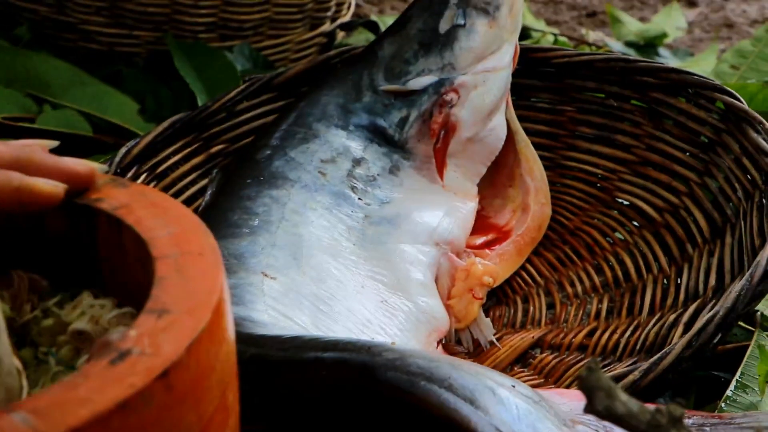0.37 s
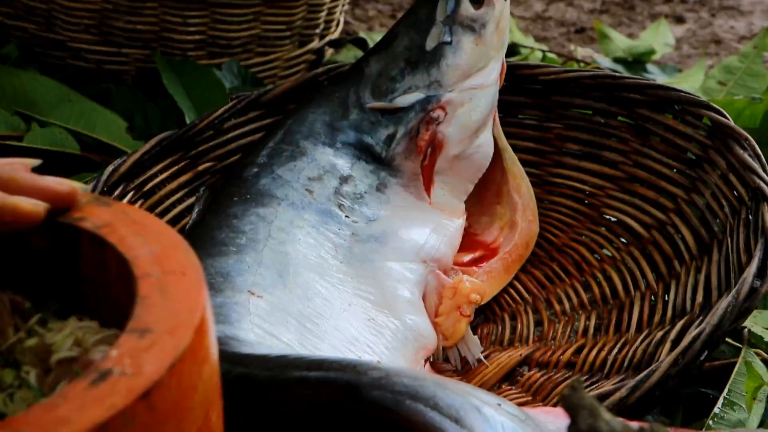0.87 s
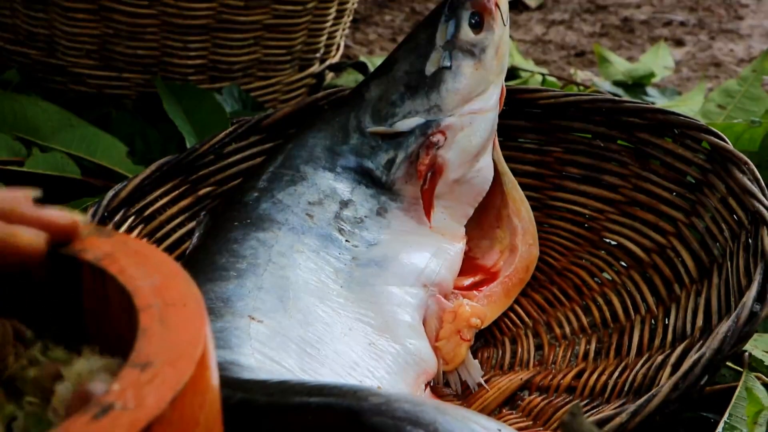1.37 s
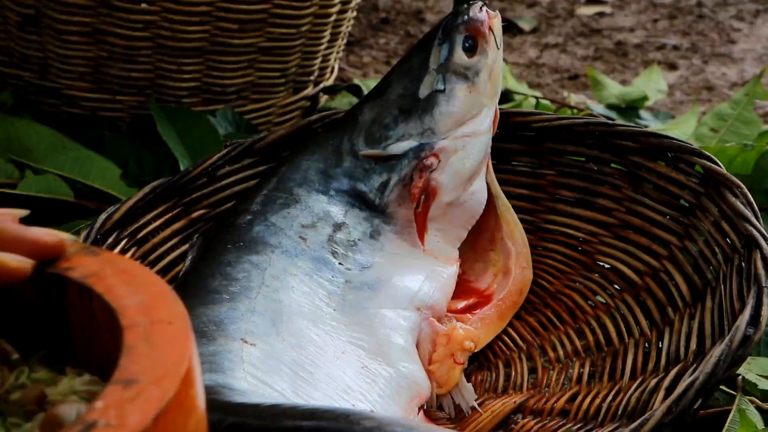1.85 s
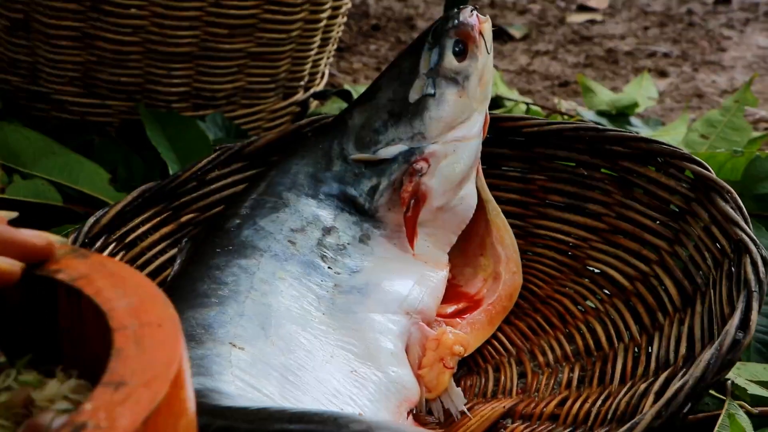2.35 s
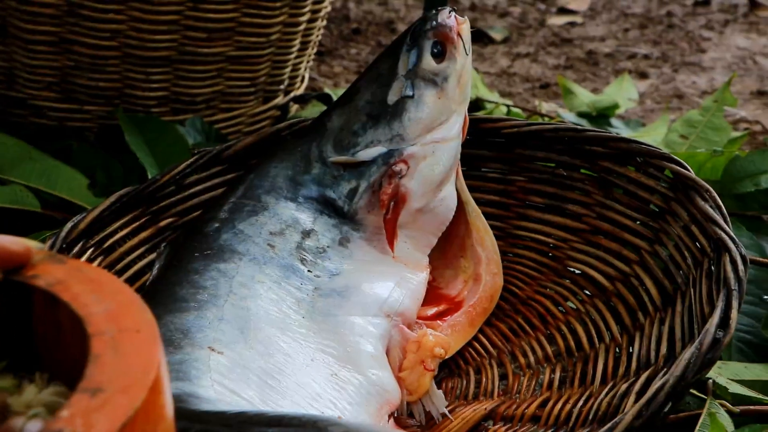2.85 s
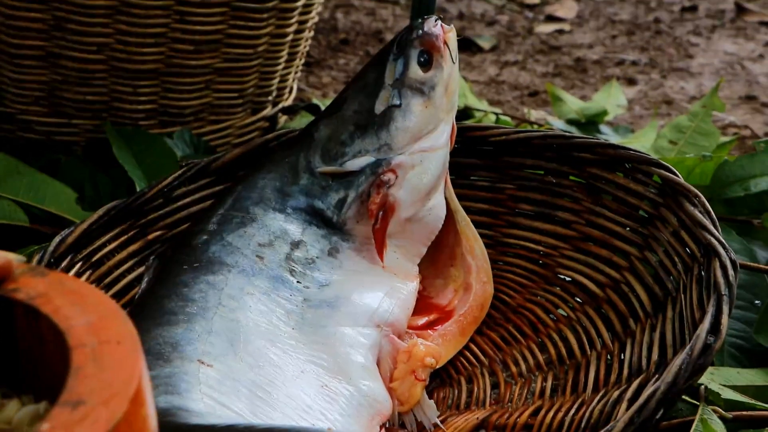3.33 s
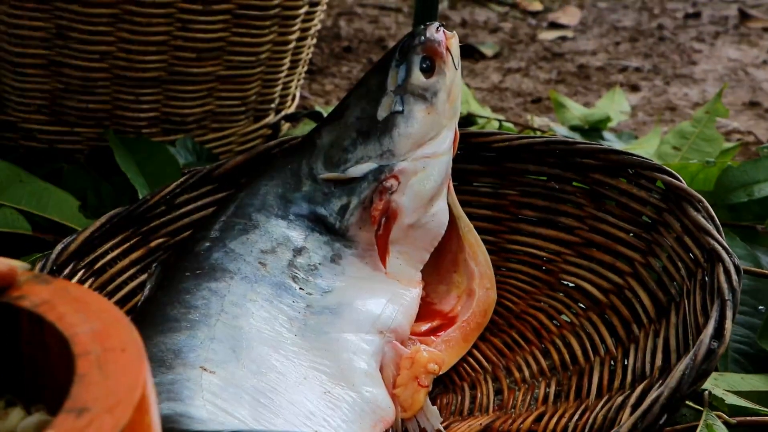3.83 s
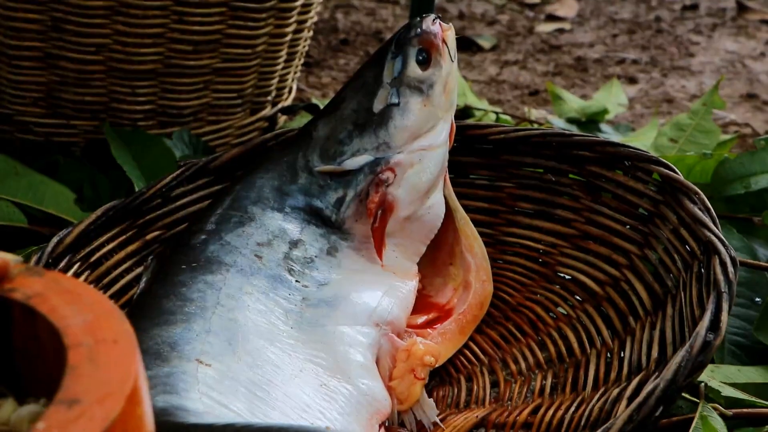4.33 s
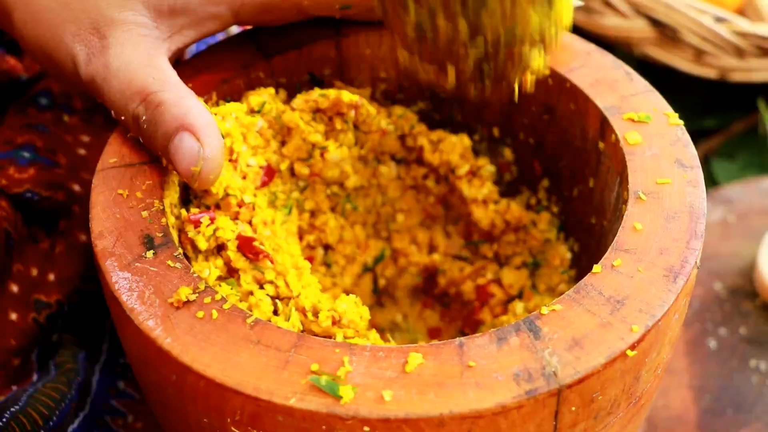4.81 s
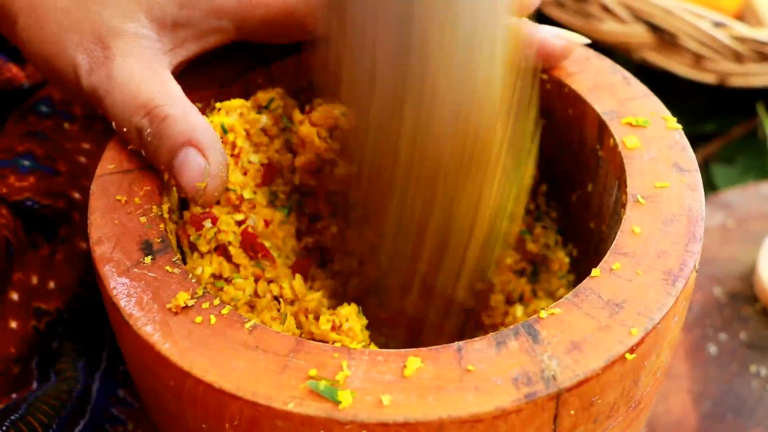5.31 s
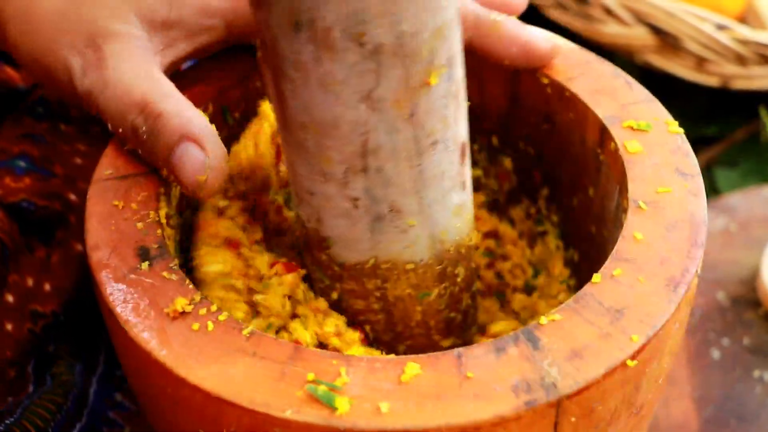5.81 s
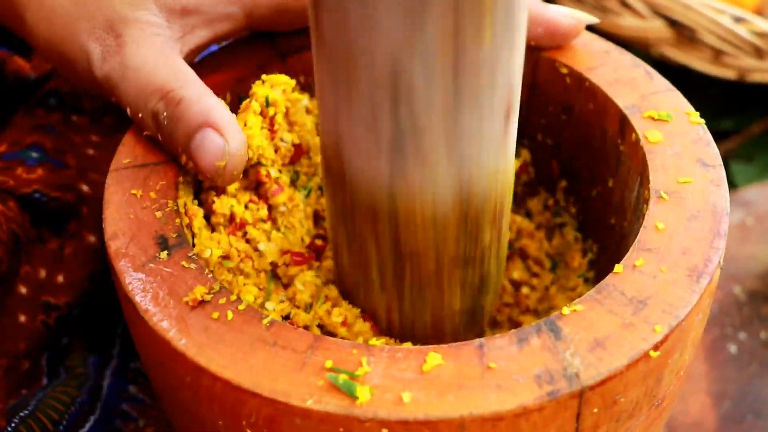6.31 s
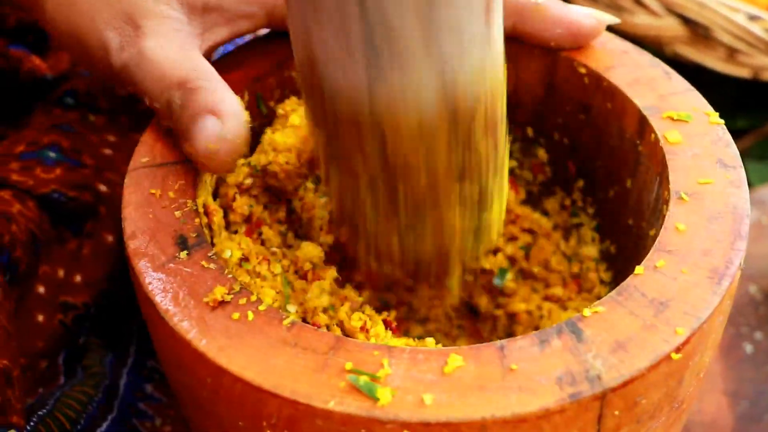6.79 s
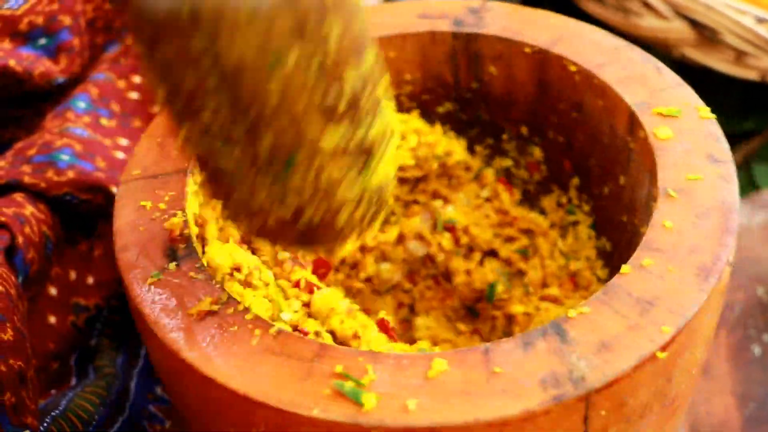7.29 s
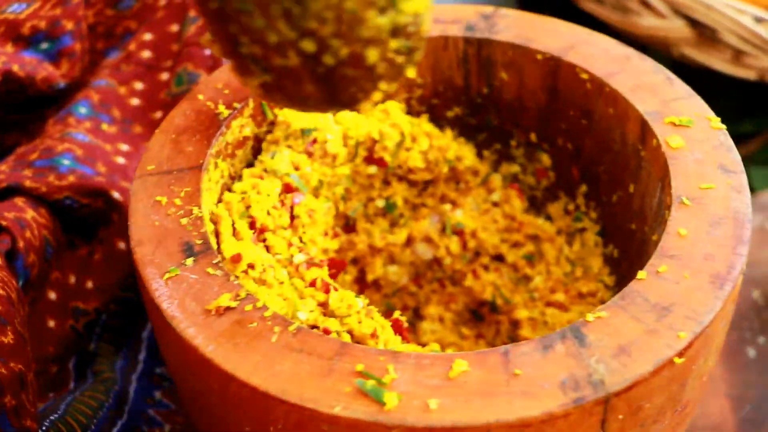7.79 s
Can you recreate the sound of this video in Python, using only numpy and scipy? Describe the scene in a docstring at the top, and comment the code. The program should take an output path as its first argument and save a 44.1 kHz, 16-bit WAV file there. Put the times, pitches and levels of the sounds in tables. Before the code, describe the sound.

A wooden pestle pounds crunching spices in a wooden mortar in steady beats, low thuds beneath, ending with slower blows and lighter knocks outdoors.

```python
"""Blow after blow, spices crunch, wood knocks and a low thud follows; small crumbs click in between.
A wooden pestle pounds in a wooden mortar on the ground of a forest clearing: snapping grains make the
crunch, decaying modes the knocks, and the mortar resonating on the soil the thuds.
First a single microphone listens, with a faint motor ticking near it and a low hum from far away;
then a stereo pair with gain control, left louder. Behind both lies forest air, made of banded noise."""
import sys
import numpy as np
from scipy import signal
from scipy.io import wavfile
from scipy.ndimage import uniform_filter1d

SR = 44100
rng = np.random.default_rng(int(sys.argv[2]) if len(sys.argv) > 2 else 0)


def boost(x):
    """Linear amplitude factor 10**(x/20) for a level x in decibels (scalar or array-like)."""
    u = np.asarray(x, float) / 20
    return 10 ** u


def master_out(mix):
    """Clip the mix to full scale and print it as 16-bit PCM to the path in sys.argv[1]."""
    frames = np.transpose(np.atleast_2d(mix))
    ceiling = np.clip(frames, -1, 1)
    pcm = np.round(ceiling * 32767).astype(np.int16)
    wavfile.write(sys.argv[1], SR, pcm)


N = 359415

# forest air at the single microphone, then at the pair: spectrum shape [f/Hz, relative level per Hz/dB]
AIR_SINGLE = [(15, -31.5), (25, 1), (91, 1.5), (463, -16), (1040, -18), (1890, -17), (3240, -23.5),
              (5130, -21.5), (7290, -24), (8810, -17), (10600, -27), (14700, -28), (16000, -27)]
AIR_PAIR = [(15, -36.5), (25, -1.5), (137, -2.5), (270, -5), (489, -13.5), (817, -16), (1230, -14.5),
            (1940, -18.5), (2830, -18.5), (4860, -25), (8810, -20), (14700, -38), (16000, -42)]
# air between the capsules of the pair [f/Hz, left-right likeness, used from 0 to 1]
AIR_LIKENESS = [(60, 0.71), (240, 0.68), (950, 0.16), (3770, -0.04), (15000, -0.03)]
# air at the pair [f/Hz, left minus right level/dB]
AIR_LEAN = [(60, 8.5), (380, 7.0), (2380, 4.5), (15000, 5)]
# distant hum at the single microphone [t/s, rms level/dB]
DRONE_LEVEL = [(0.0, -48), (0.25, -48), (0.46, -52), (1.12, -55), (1.68, -51), (2.01, -46), (2.25, -53),
               (2.88, -55), (3.02, -50), (3.41, -45), (3.72, -49), (4.54, -47), (4.75, -51)]
# motor near the single microphone [t/s of the first tick, number of ticks]
MOTOR_RUNS = [(.114, 12), (.654, 10)]
# resonances of the motor housing [f/Hz, mean level/dB, t60/s]
MOTOR_HOUSING = [(2940, -39, .015), (3450, -40, .007), (4030, -38, .008), (4780, -40, .007)]
# thin ringing of something small and hard [t/s, mean level/dB]
TINKLES = [(3.269, -41), (3.407, -41), (3.663, -37), (3.6685, -20), (3.6705, -24), (3.692, -43)]
# its resonances [f/Hz, mean relative level/dB, t60/s]
TINKLE_MODES = [(5550, -8, .032), (7950, -3, .03), (8800, -3, .018), (12500, -4, .012)]
# crumbs and small ticks [t/s, peak level/dB, pitch f/Hz]
CRUMBS = [(0.1374, -33, 5770), (0.4125, -28, 2860), (0.4788, -26.5, 9740), (0.819, -24, 9200),
          (0.9926, -19, 7270), (1.1343, -36, 2930), (1.254, -35.5, 2950), (1.5364, -23, 6120),
          (1.5848, -29, 9180), (1.9999, -19, 5830), (2.2398, -33, 2470), (2.6184, -28.5, 4810),
          (2.9557, -30, 3170), (3.0669, -34, 9980), (3.1792, -16.5, 7240), (3.2884, -20.5, 9200),
          (3.3164, -30, 4060), (3.3298, -26, 4160), (3.3434, -30, 2390), (3.6688, -19, 8500),
          (3.6795, -29, 7920), (4.3994, -25.5, 5890), (4.4223, -20.5, 9400), (4.5725, -31, 5880),
          (5.2475, -30.5, 6980), (5.5353, -34.5, 3560), (6.8129, -23.5, 9770), (6.9546, -33, 8420),
          (7.3766, -33.5, 8920), (7.4525, -31.5, 8130), (7.7553, -37, 3060), (8.083, -34.5, 7730)]
# wood meets wood [t/s, crack level/dB, hollow level/dB, ring level/dB, side struck/turns round the bowl]
KNOCKS = [(0.0048, -4, -17, 0, .52), (0.0078, 3, -6, -7, .33), (0.341, -14, -34, -9, .66),
          (0.355, -3, -14, -9, .8), (0.6907, -21, -26, -10, .05), (0.6993, -19, -38, -11, .6),
          (0.7072, 3, 1, -5, .92), (1.0466, -16, -22, -4, .16), (1.0618, -6, -3, -2, .95),
          (1.4101, -21, -27, -10, .05), (1.4276, -2, -9, -12, .7), (1.7698, -3, -30, -9, .58),
          (1.7788, -11, -24, 1, .5), (1.7857, -7, -11, -5, .33), (2.1388, -5, -17, -2, .22),
          (2.1434, 5, -26, -3, .56), (2.4988, -16, -21, -11, .68), (2.5061, 5, -14, -7, .76),
          (2.8538, -19, -23, -8, .36), (2.8638, 2, -15, -4, .43), (3.2028, -24, -39, -16, .62),
          (3.2125, -16, -23, -15, .95), (3.222, -1, -10, -4, .8), (3.5727, -7, -30, -2, .52),
          (3.5749, -1, -27, 3, .54), (3.9359, -3, -10, -4, .85), (4.292, -2, -11, -5, .99),
          (4.6482, -3, -9, -7, .86), (4.9725, -10, -21, -11, .34), (4.9768, -12, -14, -11, .47),
          (5.3861, -4, -14, 1, .63), (5.3912, -18, -22, -9, .62), (5.8008, -19, -16, -14, .75),
          (6.1999, -5, -11, 3, .43), (6.6048, -19, -16, -25, .95), (7.1027, -26, -12, -5, .14),
          (7.1058, -30, -19, -9, .3), (7.2867, -23, -8, -6, .15), (7.2896, -25, -18, -2, .28)]
# modes of the wood, before damping and detuning
# [f/Hz, relative level/dB, t60/s, driven by 1 crack, 2 hollow, 3 bowl, 4 wall, 5 pestle]
WOOD_MODES = [(300, 4, .024, 2), (450, 6, .02, 2), (745, 4, .03, 3), (1168, -9, .07, 4), (1180, 0, .026, 4),
              (1480, 2, .024, 5), (2250, -8, .026, 1), (3000, -6, .016, 1), (4200, -7, .011, 1),
              (5700, -11, .01, 1), (7400, -11, .009, 1), (9500, -14, .008, 1)]
# full blows through the spices to the bottom
# [t/s of the crunch peak, relative crunch level/dB, sinking/s, relative treble level/dB, relative thud level/dB]
BLOWS = [(.008, -12.5, .005, -8, -10), (.357, -13.5, .016, -11.5, -6.5), (.7085, -19, .018, -9, -14.5),
         (1.0635, -18, .017, -7.5, -16.5), (1.4285, -14, .02, -10, -9), (1.786, -20, .017, -9.5, -11),
         (2.1445, -12.5, .016, -6.5, -14.5), (2.5075, -15, .01, -7, -15), (2.865, -11.5, .012, -7, -10),
         (3.223, -14.5, .013, -8, -8.5), (3.578, -13.5, .016, -4.5, -9.5), (3.937, -12.5, .01, -10, -9),
         (4.293, -9.5, .01, -9.5, -9), (4.65, -18.5, .022, -7.5, -7.5), (4.981, -24, .01, -9, -12.5),
         (5.799, -22.5, .015, -5, -16), (6.2035, -21, .004, -6, -21), (6.602, -23, .016, -8.5, -13.5)]
# spices stirred without a landing [t/s of the peak, relative level/dB, sinking/s, relative treble/dB, fade t60/s]
STIRS = [(2.62, -42, .015, -12, .04), (2.955, -42, .015, -14, .04), (3.335, -35, .02, -14, .04),
         (3.922, -36, .003, -8, .015), (4.262, -32, .002, -6, .012), (5.001, -40, .005, -3, .025),
         (5.3875, -14, .002, -1, .008), (7.1035, -40, .002, -10, .015), (7.289, -36, .003, -10, .015)]
# mortar on the soil [f/Hz, relative level/dB, t60/s]
GROUND_MODES = [(63, -8, .1), (78, -1, .135), (135, -11, .07)]
# crunch spectrum shape [f/Hz, relative level per Hz/dB]
CRUNCH_SPECTRUM = [(180, -38), (300, -14), (800, -1), (2200, -2.5), (4000, -7), (7000, -12), (10000, -18),
                   (14000, -26), (16000, -38)]

FADE_START_S, FADE_END_S = 4.70, 4.76   # from the single microphone to the pair
LEFT_RIGHT = np.array([[1], [-1]])


def at_hz(points, hz):
    """Read a table along log frequency."""
    f, value = np.transpose(points)
    return np.interp(np.log(hz), np.log(f), value)


def clicks(seconds, heights):
    """Impulses of the given heights on two channels, the start of every resonance."""
    out = np.full((N, 2), 1e-18)
    index = (np.asarray(seconds) * SR).astype(int)
    np.add.at(out, index, np.reshape(heights, (len(seconds), -1)))
    return out.T


def ring(x, hz, t60, crest=False):
    """A unit click starts a dying sine, or a cosine that begins at its crest."""
    r = boost(-60 / (max(t60, .001) * SR))
    w = 2 * np.pi * hz / SR
    top = [1, -r * np.cos(w)] if crest else [0, np.sin(w)]
    return signal.lfilter(top, [1, -2 * r * np.cos(w), r * r], x)


def soften(x, hz):
    """Two one-pole low-passes, as in a contact of finite length."""
    r = np.exp(-2 * np.pi * hz / SR)
    return signal.lfilter([(1 - r) ** 2], [1, -2 * r, r * r], x)


def third_octaves():
    """Third-octave band-pass filters from 22 Hz up, with their centres."""
    edges = 22 * 2 ** np.arange(0, 9.7, 1 / 3)
    return [(signal.butter(2, (low, high), "band", fs=SR, output="sos"), np.sqrt(low * high))
            for low, high in zip(edges, edges[1:])]


def pair_share():
    """0 while the single microphone listens, 1 for the pair."""
    return np.interp(np.arange(N) / SR, [FADE_START_S, FADE_END_S], [0, 1])


def air(pair):
    """Distant leaves, insects and light wind: banded noise that flickers slightly."""
    single_db, pair_db = -44, -45   # rms level/dB
    flicker_db = 1.2
    white, single, stereo = rng.standard_normal((2, 2, N)), 0, 0
    for k, (sos, hz) in enumerate(third_octaves()):
        mid, side = signal.sosfilt(sos, white[k % 2])   # neighbouring bands use separate noise
        # one point per 100 samples, so 900 Hz here acts as 9 Hz
        slow = soften(rng.standard_normal(N // 100 + 2), 900)
        wander = np.interp(np.arange(N) / 100, np.arange(len(slow)), slow / slow.std())
        flicker = boost(flicker_db * wander)
        alike = np.clip(at_hz(AIR_LIKENESS, hz), 0, 1)
        both = np.sqrt(1 + alike) * mid + np.sqrt(1 - alike) * side * LEFT_RIGHT
        single = single + flicker * boost(at_hz(AIR_SINGLE, hz)) * mid
        band_db = at_hz(AIR_PAIR, hz) + at_hz(AIR_LEAN, hz) / 2 * LEFT_RIGHT
        stereo = stereo + flicker * boost(band_db) * both
    single = boost(single_db) * single / single.std()
    stereo = boost(pair_db) * stereo / stereo.std()
    return (1 - pair) * single + pair * stereo


def drone():
    """A low, wavering hum from far away: noise through the same resonance twice."""
    hz, t60 = 88, .12
    s, db = np.transpose(DRONE_LEVEL)
    hum = ring(ring(rng.standard_normal(N), hz, t60), hz, t60)
    return boost(np.interp(np.arange(N) / SR, s, db)) * hum / hum.std()


def trees(x):
    """Trunks and leaves scatter back a dull, short haze: convolution with decaying noise."""
    t = np.arange(int(.4 * SR)) / SR
    haze = soften(rng.standard_normal((2, len(t))), 2000)
    haze = haze * boost(-60 * t / .3) * (t > .012)   # t60 0.3 s, nothing back in the first 12 ms
    return boost(-59) * signal.fftconvolve(x, haze, axes=1)[:, :N]


def motor():
    """Evenly spaced little ticks, each ringing a small housing."""
    period_s, spread_db = .04, 2.0
    s = np.concatenate([start + period_s * np.arange(count) for start, count in MOTOR_RUNS])
    chance = rng.standard_normal((len(s), len(MOTOR_HOUSING)))
    return sum(ring(clicks(s, boost(db + spread_db * chance[:, k])), hz, t60)
               for k, (hz, db, t60) in enumerate(MOTOR_HOUSING))


def tinkles():
    """Something small and hard rings thinly in a few high modes."""
    spread_db = 2
    s, db = np.transpose(TINKLES)
    chance = rng.standard_normal((len(s), len(TINKLE_MODES)))
    return sum(ring(clicks(s, boost(db + level_db + spread_db * chance[:, k])), hz, t60)
               for k, (hz, level_db, t60) in enumerate(TINKLE_MODES))


def crumbs():
    """A crumb is a puff of bright noise round its own pitch, gone in milliseconds."""
    t60 = .012
    out, t = np.zeros((2, N)), np.arange(2000) / SR
    noise = rng.standard_normal((len(CRUMBS), 2000))
    for (s, db, hz), puff in zip(CRUMBS, noise):
        puff = puff * boost(-60 * t / t60)
        edges = [.55 * hz, min(2.5 * hz, 16000)]
        hiss = signal.sosfilt(signal.butter(2, edges, "band", fs=SR, output="sos"), puff)
        sound = hiss + .08 * ring(puff, hz, .4 * t60)
        i = int(s * SR)
        out[:, i:i + 2000] += boost(db) * sound / np.abs(sound).max()
    return out


def landings():
    """Times of the thud crests, a set lag after the crunch peaks, and their levels."""
    coarse_lag_s, fine_lag_s = .0106, .0056   # coarse spices, then the finer paste
    s, db = np.transpose(BLOWS)[[0, 4]]
    return s + np.where(s < FADE_START_S, coarse_lag_s, fine_lag_s), db


def knocks():
    """Each mode swells for a cycle and dies; under a full blow the spices damp and detune the wood."""
    buried_ring, buried_detune = .6, .05   # share of ring time left, pitch spread, deep in the spices
    rim_ring, rim_detune = .6, .01   # a rim knock hardly sustains the bowl's low modes
    far_side_db = -16   # bowl, wall and pestle modes: level opposite their best side
    out, t = np.zeros((2, N + 4000)), np.arange(4000) / SR
    chance = rng.standard_normal((len(KNOCKS), len(WOOD_MODES), 4))
    full_blows = landings()[0]
    for (s, crack_db, hollow_db, ring_db, side), draws in zip(KNOCKS, chance):
        buried = np.any((full_blows > s) & (full_blows < s + .04))
        i = int(s * SR)
        # the best sides lie a third of a turn apart; 0 there, 1 opposite
        away = (1 - np.cos(2 * np.pi * (side - np.arange(3) / 3))) / 2
        drive_db = [crack_db, hollow_db, *(ring_db + far_side_db * away)]
        for (hz, level_db, t60, column), (tune, phase, apart, tilt) in zip(WOOD_MODES, draws):
            hz = hz * (1 + (buried_detune if buried else rim_detune) * tune)
            if hz > 1000 and buried:
                t60 = t60 * buried_ring
            elif hz <= 1000 and not buried:
                t60 = t60 * rim_ring
            swell = (1 - np.exp(-t * hz / .35)) ** 2
            shape = swell * boost(drive_db[int(column) - 1] + level_db - 60 * t / t60)
            # phases scatter more for high modes, and a little between the ears
            start = phase * hz / 1500 + .25 * apart * LEFT_RIGHT
            wave = np.sin(2 * np.pi * hz * t + start)
            out[:, i:i + 4000] += shape * boost(.7 * tilt * LEFT_RIGHT) * wave
    return out[:, :N]


def thuds():
    """A downward jolt, then the heavy mortar rings on the soil with a short snap near its first crest."""
    snap_db = -11   # re thud
    jolt_db, jolt_follows = -9, .4   # jolt at a 0 dB thud, and its share of the thud's dB
    s, db = landings()
    cushion_db = -7 * (s > FADE_START_S)   # the finer paste softens snap and jolt
    s = s - .0015   # the soft contact delays the crest
    out = sum(ring(clicks(s + .0008, boost(db + level_db)), hz, t60, crest=True)
              for hz, level_db, t60 in GROUND_MODES)
    out += ring(clicks(s, boost(db + snap_db + cushion_db)), 150, .032, crest=True)
    out -= ring(clicks(s - .007, boost(jolt_db + jolt_follows * db + cushion_db)), 95, .025)
    return soften(out, 320)


def crush():
    """Dense snapping grains swell while the pestle sinks in, then die fast, leaving a short rustle."""
    coarse_touch_db, fine_touch_db = -33, -24   # a crunch starts here: coarse spices, finer paste
    least_swell_db = 3   # it swells at least this much
    fade_t60_s, fade_s_per_db = .03, .0007   # fade under a 0 dB thud; softer thuds fade sooner
    grains_per_s = 6000
    t, body, treble = np.arange(N) / SR, np.zeros(N), np.zeros(N)
    landed = [(*row, fade_t60_s + fade_s_per_db * thud_db) for *row, thud_db in BLOWS]
    for s, db, sinking_s, treble_db, t60 in landed + STIRS:
        since = t - s
        after = np.maximum(since, 0)
        rustle = boost(-17 - 60 * after / (7.0 * t60))
        fade = boost(-60 * after / t60) + rustle
        touch_db = fine_touch_db if s > FADE_START_S else coarse_touch_db
        start_db = min(touch_db - db, -least_swell_db)   # re peak
        swell = boost(start_db * np.clip(-since / sinking_s, 0, 1)) * (since > -sinking_s)
        shape = boost(db) * np.where(since < 0, swell, fade)
        body += shape
        treble += shape * boost(treble_db + 10)
    heights = boost(4.0 * np.minimum(rng.exponential(1, N), 4))
    snaps = (rng.random(N) < grains_per_s / SR) * heights * rng.choice([-1, 1], N)
    # grains lie all over the bowl: each ear hears them differently
    apart = snaps * rng.choice([-1, 1], N)
    grains = np.array([snaps + .35 * apart, snaps - .35 * apart]) / snaps.std()
    out = 0
    for sos, hz in third_octaves()[10:]:
        driven = grains * (body if hz < 4500 else treble) + 1e-18
        out = out + boost(at_hz(CRUNCH_SPECTRUM, hz) + 15.5) * signal.sosfilt(sos, driven)
    return out


def lean(x, db):
    """Left of centre by level, left minus right/dB, yet two samples sooner on the right."""
    left, right = x * 2 / (1 + boost(-db * LEFT_RIGHT))
    return np.array([np.roll(left, 2), right])


def scene():
    """The single microphone fades over to the pair, which hears the mortar left of centre."""
    pair, wood = pair_share(), knocks()
    rim = wood + trees(wood) + crumbs() + tinkles()
    bottom = crush() + thuds()
    single = (rim + bottom + motor()).mean(axis=0) + drone()
    stereo = lean(rim, 4.0) + lean(bottom, 8.5)
    return (1 - pair) * single + pair * stereo + air(pair)


def roll_off(x):
    """The treble ends steeply here."""
    return signal.sosfilt(signal.butter(12, 16120, fs=SR, output="sos"), x)


def record(dry):
    """The pair ducks just after a bright crack and recovers steadily; peaks clip, the top is cut."""
    threshold_db, duck_per_db, most_duck_db = -26, 2.2, 22
    recovery_db_per_s = 100
    t = np.arange(N) / SR
    high_pass = signal.butter(2, 3500, "high", fs=SR, output="sos")
    bright = signal.sosfilt(high_pass, dry.mean(axis=0))
    level_db = 10 * np.log10(uniform_filter1d(bright ** 2, size=200) + 1e-12)
    over_db = duck_per_db * np.maximum(level_db - threshold_db, 0)
    duck_db = np.minimum(over_db, most_duck_db) * pair_share()
    # a running maximum on a rising slope lets each duck fall back linearly
    held_db = np.maximum.accumulate(duck_db + recovery_db_per_s * t) - recovery_db_per_s * t
    late_db = soften(np.roll(held_db, 160), 110)   # 160 samples late, then smoothed
    heard = np.clip(dry * boost(-late_db), -1, 1)
    heard = signal.sosfilt(signal.cheby2(12, 60, 16600, fs=SR, output="sos"), heard)
    return roll_off(heard)


dry = scene()
out = record(dry)
master_out(out)
```